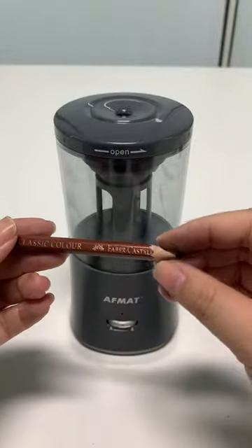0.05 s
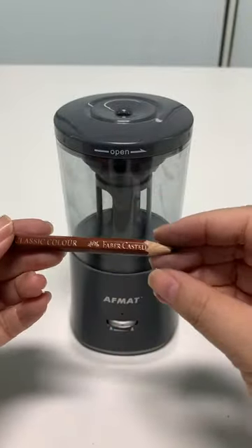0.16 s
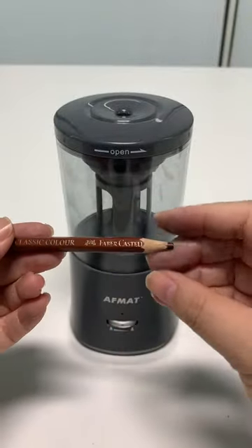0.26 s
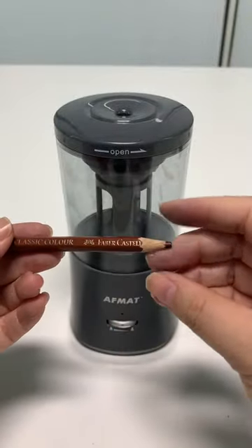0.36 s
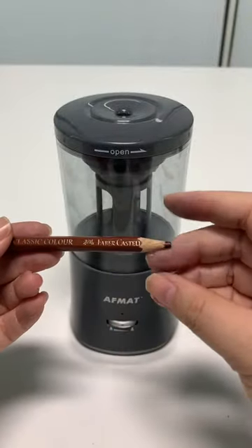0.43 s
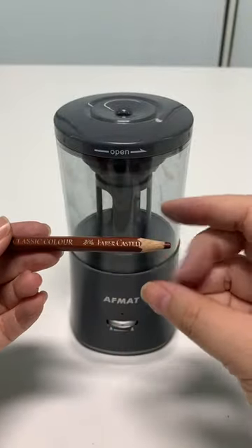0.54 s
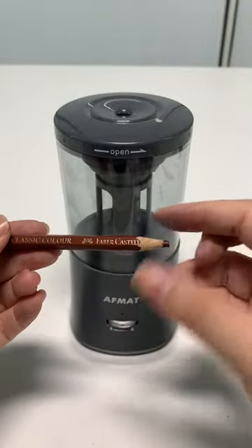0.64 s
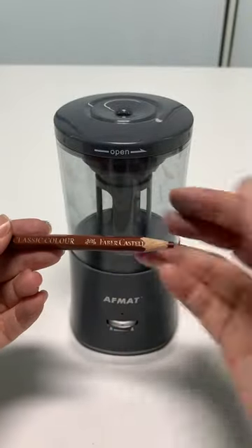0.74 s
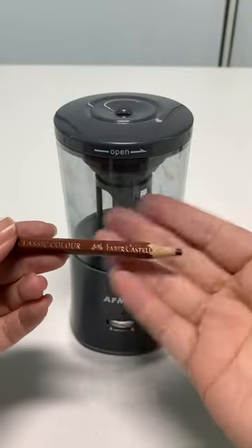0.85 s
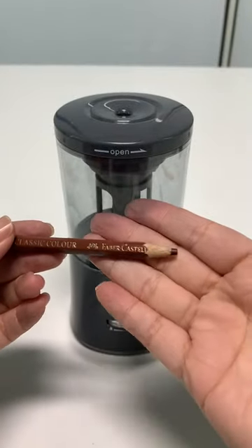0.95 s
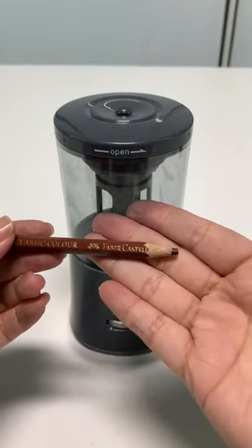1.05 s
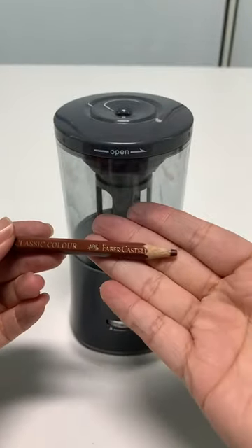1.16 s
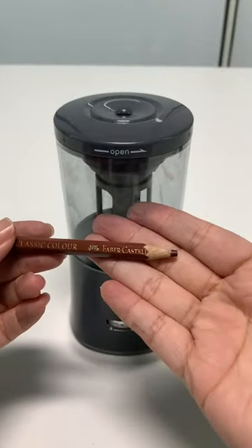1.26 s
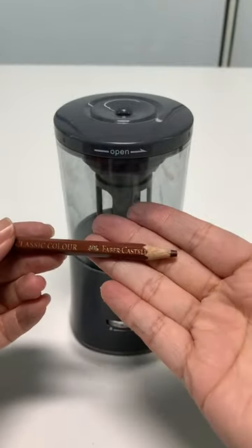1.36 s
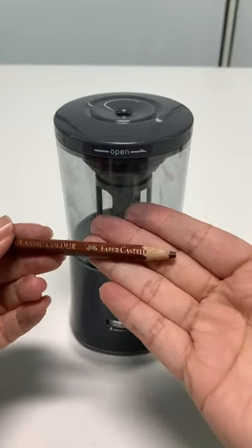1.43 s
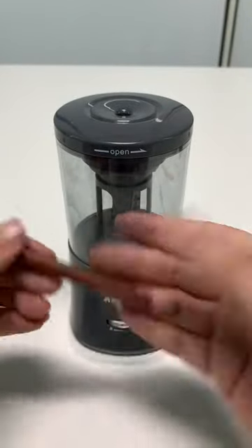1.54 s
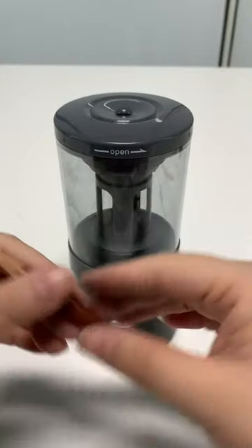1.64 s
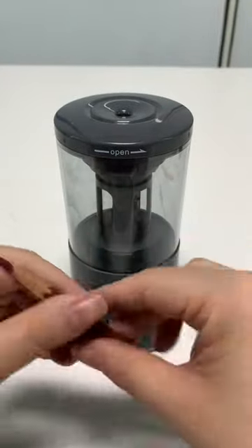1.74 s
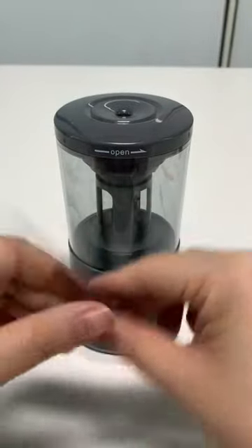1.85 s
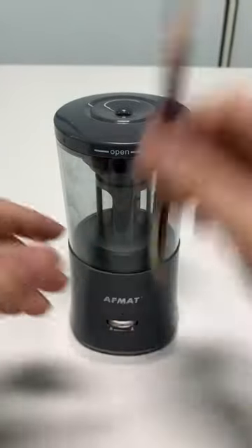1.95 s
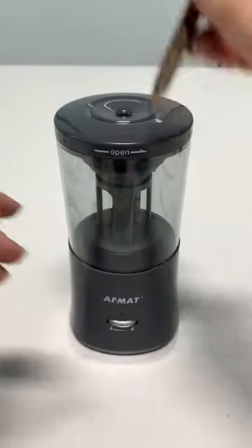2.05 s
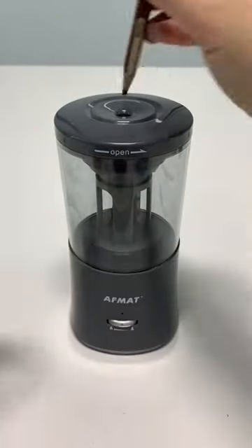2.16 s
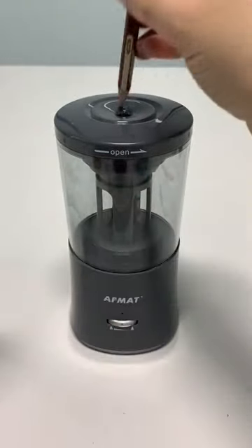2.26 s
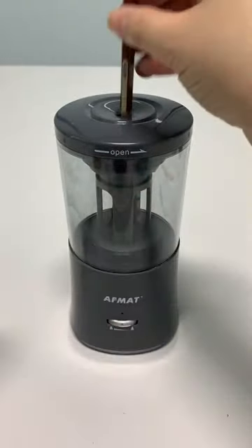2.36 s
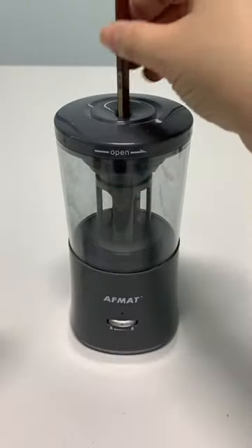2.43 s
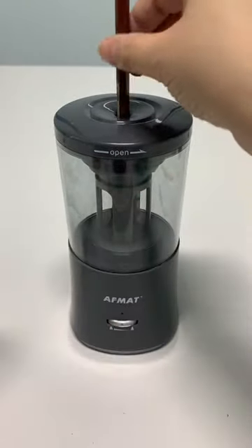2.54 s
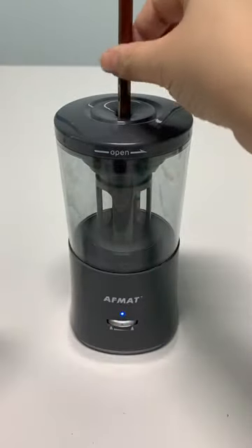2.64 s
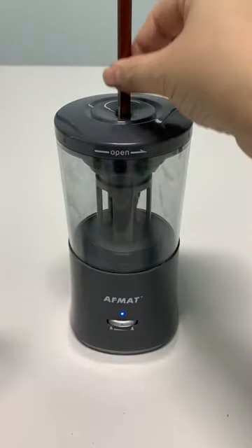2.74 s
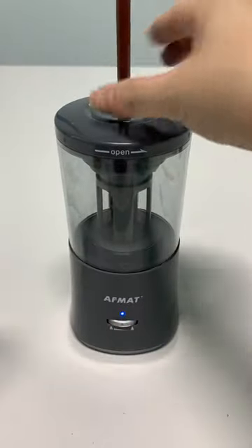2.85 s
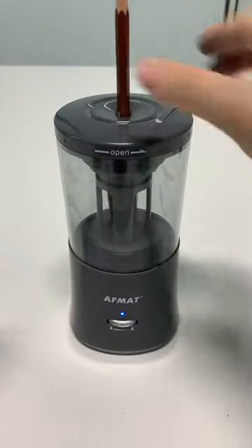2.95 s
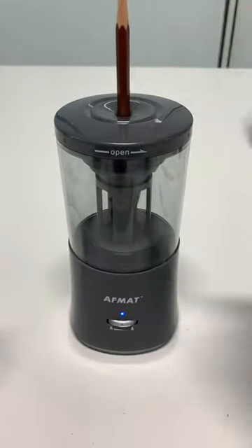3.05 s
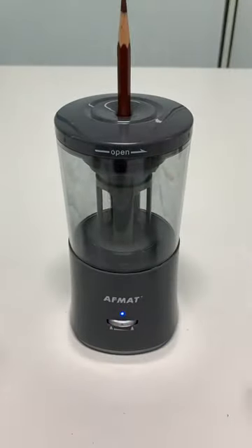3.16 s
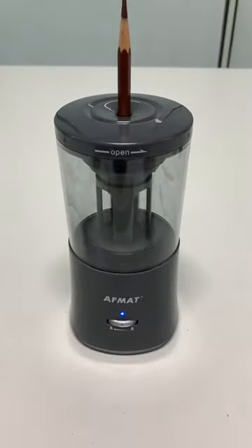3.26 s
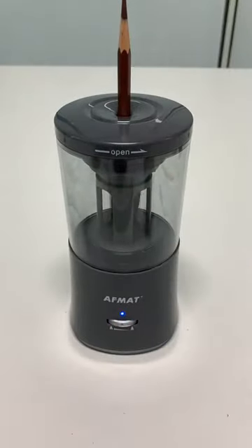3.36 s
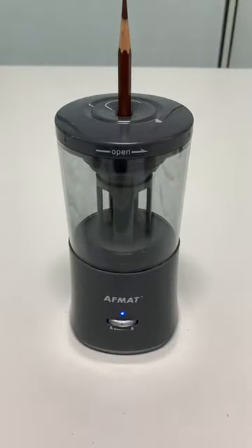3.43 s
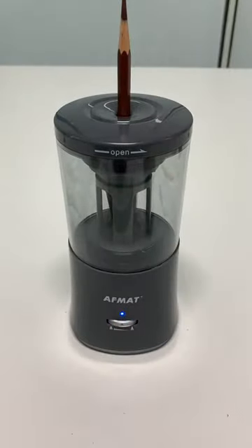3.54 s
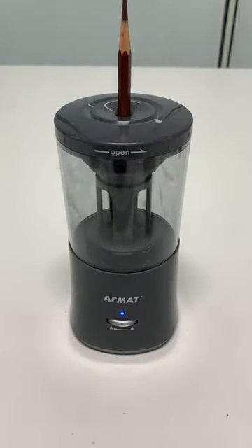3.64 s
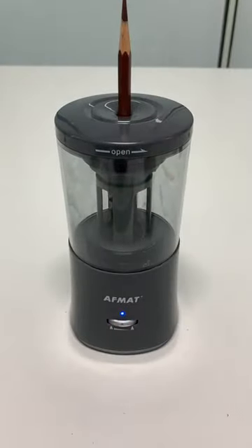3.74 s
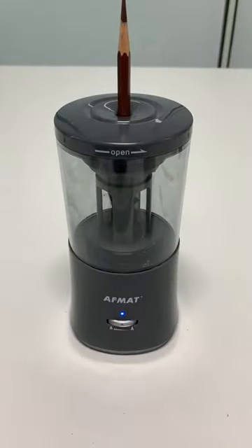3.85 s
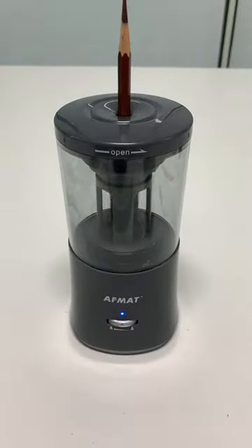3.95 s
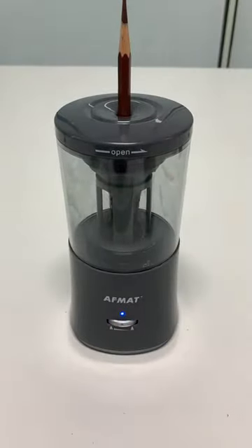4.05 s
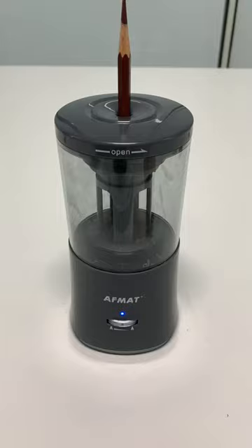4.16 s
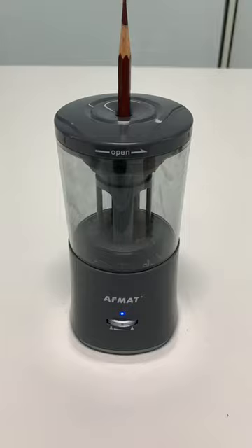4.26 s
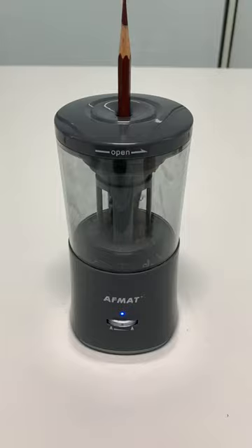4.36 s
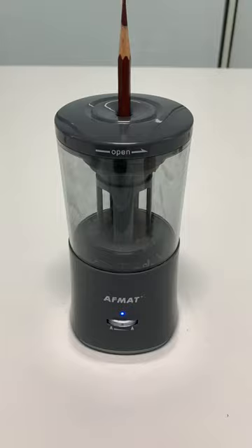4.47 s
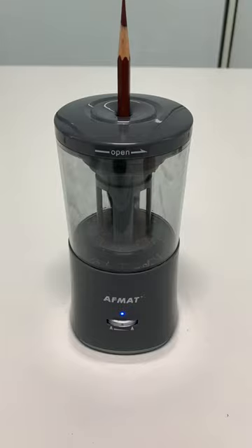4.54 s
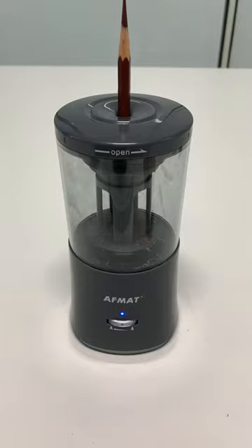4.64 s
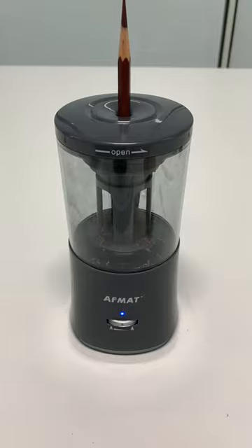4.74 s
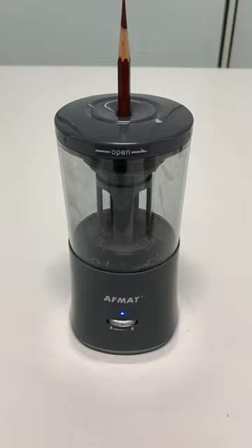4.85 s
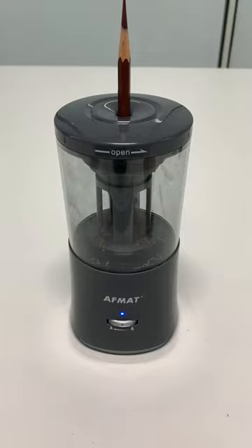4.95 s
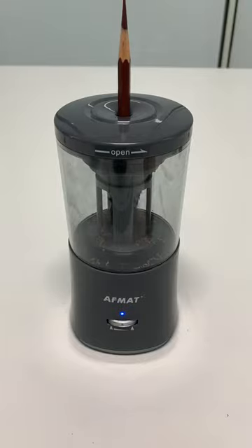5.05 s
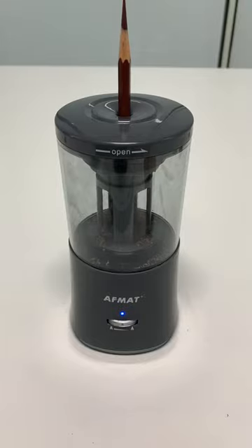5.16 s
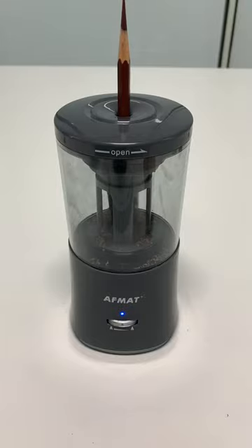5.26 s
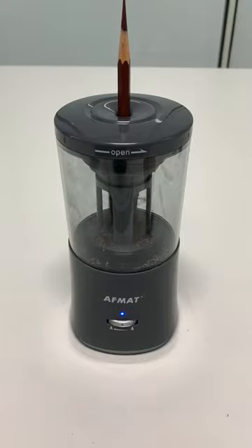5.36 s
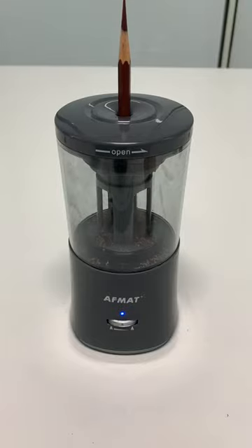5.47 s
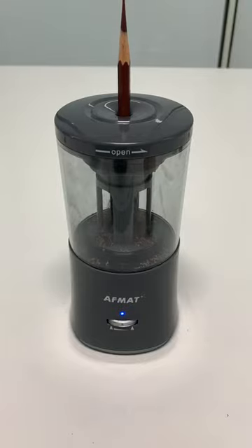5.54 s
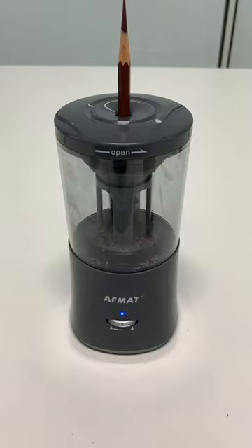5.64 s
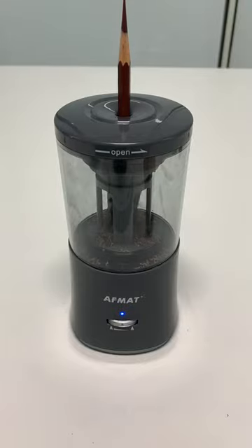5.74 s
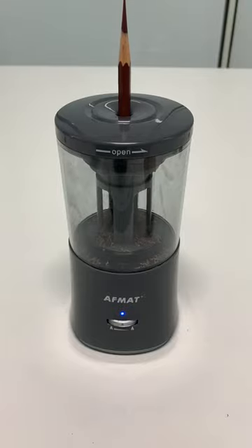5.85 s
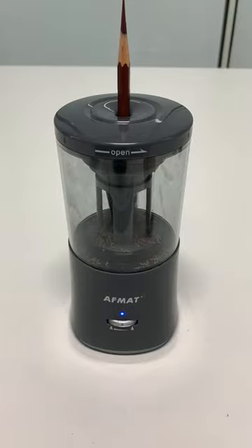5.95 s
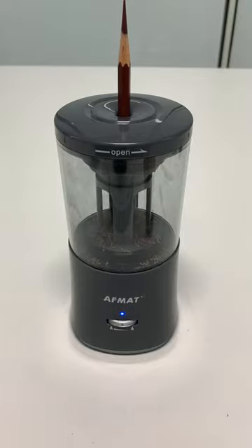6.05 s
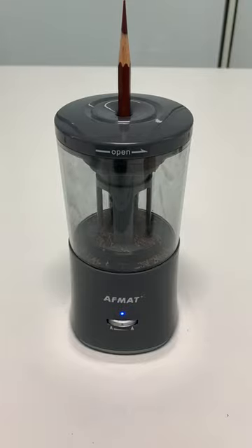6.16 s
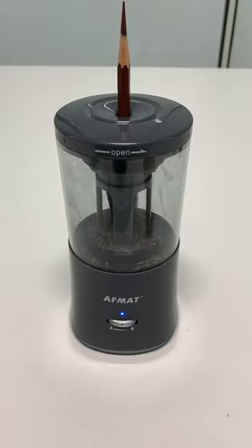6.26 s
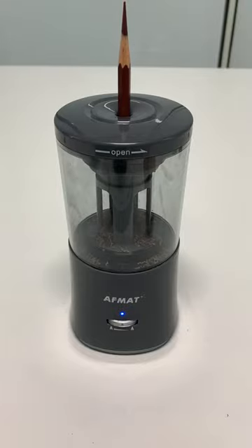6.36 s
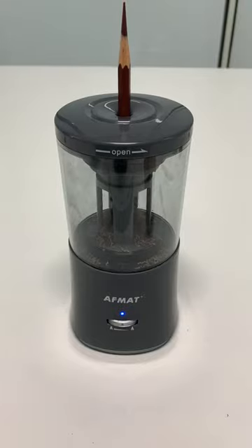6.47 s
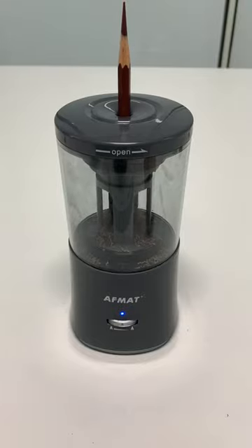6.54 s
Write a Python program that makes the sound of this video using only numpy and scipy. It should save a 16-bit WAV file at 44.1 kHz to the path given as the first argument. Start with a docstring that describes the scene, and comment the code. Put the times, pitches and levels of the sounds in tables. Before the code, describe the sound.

In a quiet room, hands faintly rub a pencil, it ticks into a small electric sharpener, and the motor whirs up and grinds harshly.

```python
"""A quiet room with an electric pencil sharpener on a desk, heard close up by a pair of microphone ports.
Over a low rumble, hands rub a pencil as band-limited noise; it scrapes and ticks into the hole as tiny impacts.
The motor spins up, its hum, gear whine and brush buzz locked to the shaft, then sags as the cutter bites.
Random impacts rattle the gears, hiss on the steel and rasp through the wood three turns a second.
At last the drive lets go and the gears and cutter fall away."""
import sys
import numpy as np
from scipy import signal
from scipy.fft import rfft, irfft, next_fast_len
from scipy.io import wavfile

SR = 44100
rng = np.random.default_rng(int(sys.argv[2]) if len(sys.argv) > 2 else 0)


def to_wav(sig):
    """Store sig (one row per channel, or 1-D mono) as 16-bit WAV at the path in sys.argv[1].

    Samples outside -1..1 are clipped; the rate is SR.
    """
    pcm = np.clip(np.atleast_2d(sig), -1, 1) * 32767
    pcm = np.round(pcm).astype(np.int16)
    wavfile.write(sys.argv[1], SR, pcm.T)  # frames by channels


N = 291060
T = np.arange(N) / SR
SIZE = next_fast_len(N + SR // 4)  # padded length for filtering
HZ = np.fft.rfftfreq(SIZE, 1 / SR)


def amp(db):
    """Decibels to amplitude."""
    return 10 ** (np.asarray(db) / 20)


def unit(x):
    """Scales a signal to rms 1."""
    return x / np.sqrt(np.mean(x ** 2) + 1e-20)


def noise():
    """White noise."""
    return rng.standard_normal(N)


def curve(rows):
    """A table's values joined by straight lines in time."""
    seconds, value = np.transpose(rows)
    return np.interp(T, seconds, value)


def read(points, hz):
    """A spectrum joined on a log-frequency axis."""
    f, value = np.transpose(points)
    return np.interp(np.log(hz + 1), np.log(f + 1), value)


def shaped(x, response):
    """Filters by a response given on HZ."""
    return irfft(rfft(x, SIZE) * response, SIZE)[..., :N]


def colour(x, points):
    """Filters by a dB spectrum."""
    return shaped(x, amp(read(points, HZ)))


def ringing(modes):
    """The response of a set of resonances on HZ."""
    return sum(amp(db) / (1 + 1j * (HZ ** 2 - hz ** 2) / (width * HZ + 1)) for hz, width, db in modes)


def wander(hz):
    """A random curve of rms 1, joining two random values per cycle of the given rate."""
    steps = T * 2 * hz
    knots = rng.standard_normal(4096)
    return unit(np.interp(steps, np.arange(len(knots)), knots))


def grains(per_s, spread_db):
    """Random tiny impacts, a few much larger than the rest."""
    size = amp(spread_db * np.minimum(rng.exponential(1, N), 4))
    struck = rng.random(N) < per_s / SR
    return unit(noise() * size * struck)


def swell(s, length):
    """A bell-shaped rise and fall around a moment."""
    return np.exp(-2 * ((T - s) / length) ** 2)


START_S, RISE_S, RELEASE_S = 2.6006, 0.089, 6.5  # the drive starts, comes up to level, and lets go
GEAR_FALL_DB_PER_S, GEAR_COAST_DB = 245, -10
HISS_FALL_DB_PER_S, HISS_COAST_DB = 598, -17


def coast(fall_db_per_s, rest_db):
    """The drop in dB once the drive lets go."""
    return np.maximum(-fall_db_per_s * np.maximum(T - RELEASE_S, 0), rest_db)


# Rumble of the building. Each row: frequency in Hz, relative level in dB.
ROOM_SPECTRUM = [(15, -54), (27, -35), (43, -1), (104, -4.5), (131, -6.5), (287, -15), (420, -20.5),
                 (560, -35.5), (1200, -33.5), (1800, -40.5), (2300, -47.5), (3600, -49.5), (4800, -62.5),
                 (6500, -46.5), (9000, -60.5), (11500, -51)]
# Low tones that come and go in the room. Each row: middle in seconds, length in seconds,
# frequency in Hz, level in dB.
DRONES = [(.6, 0.79, 99.9, -66), (.66, 0.13, 56.8, -58), (1.273, 0.22, 101.5, -53.5),
          (1.75, 0.35, 101, -57.5), (2.07, .15, 56.4, -61), (2.32, 0.42, 199, -63)]
RUMBLE_DB = -59


def room_tone(unsteady_db=1, waver=.3):
    """Low, unsteady rumble and drone of the building; the rumble is nearly alike at both ports."""
    common = unit(colour(noise(), ROOM_SPECTRUM))
    apart = unit(colour(noise(), ROOM_SPECTRUM))
    rumble = common + amp(-16) * np.array([apart, -apart])
    drone = 0
    for s, length, hz, db in DRONES:
        tone = unit(np.sin(2 * np.pi * hz * T + waver * wander(6)))
        drone = drone + amp(db) * swell(s, length) * tone
    return amp(RUMBLE_DB + unsteady_db * wander(14.0)) * rumble + drone


# Hands brushing over the pencil and each other. Each row: middle in seconds, length in seconds,
# low rub in dB, soft swish in dB.
RUBS = [(0.095, 0.2, -66, -68.5), (0.323, 0.31, -58.5, -70.5), (0.677, 0.16, -66, -76),
        (1.143, 0.088, -69, -84), (1.257, 0.24, -57, -72), (1.542, 0.18, -67, -72.5),
        (1.8, 0.18, -66, -72.5), (1.98, 0.56, -65.5, -69.5)]
# Dull rub of skin. Each row: frequency in Hz, relative level in dB.
RUB_SPECTRUM = [(30, -25), (70, 0), (102, 0), (160, 0), (300, -2), (450, -14), (700, -56)]
# Soft swish above the rub. Each row: frequency in Hz, relative level in dB.
SWISH_SPECTRUM = [(300, 0.5), (600, -1.5), (900, -0.5), (1400, -0.5), (1800, -9.5), (2300, -23),
                  (4000, -26)]


def hands(uneven_db=1.5):
    """Skin slides on the pencil: a dull rub with a soft swish above it."""
    rub_level = sum(amp(db) * swell(s, length) for s, length, db, _ in RUBS)
    swish_level = sum(amp(db) * swell(s, length) for s, length, _, db in RUBS)
    rub = rub_level * unit(colour(noise(), RUB_SPECTRUM))
    swish = swish_level * unit(colour(noise(), SWISH_SPECTRUM))
    return (rub + swish) * amp(uneven_db * wander(5.3))


# Fingertip on the point. Each row: frequency in Hz, relative level in dB.
FLICK_SPECTRUM = [(2000, -20), (4000, -4), (5500, -8), (7000, 7), (8500, -14), (11000, -8)]


def finger(s=1.835, length_s=.012, level_db=-70):
    """A fingertip flicks softly over the pencil's point."""
    return amp(level_db) * swell(s, length_s) * unit(colour(noise(), FLICK_SPECTRUM))


# Pencil rubbing in the guide. Each row: time in seconds, level in dB.
SLIDE_LEVEL = [(2.35, -110), (2.365, -67), (2.38, -62), (2.41, -64), (2.435, -58), (2.48, -65), (2.51, -61),
               (2.545, -60), (2.58, -66), (2.622, -79), (2.632, -55), (2.66, -50), (2.7, -110)]
# Ring of the pencil in the guide, also heard in its catches. Each row: frequency in Hz, relative level in dB.
GUIDE_SPECTRUM = [(300, -14), (1200, -3.5), (2200, 0), (3200, -10), (4200, 1), (4900, 0), (5700, 3),
                  (7100, -18), (8000, -15), (11000, -23), (12500, -31)]


def slide(push_s=2.57, push_db=-52, body_hz=125, length_s=0.086, catch_db=2):
    """The pencil scrapes down the guide in small catches and, as it seats, sways the whole body."""
    scrape = amp(curve(SLIDE_LEVEL) + catch_db * wander(50)) * unit(colour(grains(4000, 0.95), GUIDE_SPECTRUM))
    push = amp(push_db) * np.exp(-((T - push_s) / length_s) ** 2)
    return scrape + push * np.sin(2 * np.pi * body_hz * T)


CLICK_T60_S = .065  # time for a click's rattle to fall 60 dB


def clicks(rows, body, click_db, tail_db, crack_s):
    """Each snap is a short crack and a dying rattle, noise coloured by the body it strikes."""
    power = np.zeros(N)
    for s, db in rows:
        age = np.maximum(T - s, 0)
        crack = np.exp(-age / crack_s)
        rattle = amp(tail_db - 60 * age / CLICK_T60_S) ** 2
        power += (T >= s) * amp(db + click_db) ** 2 * (crack + rattle)
    return unit(colour(noise(), body)) * np.sqrt(power)


# The pencil catching on the guide as it goes down. Each row: start in seconds, level in dB before click_db.
CATCHES = [(2.379, -45), (2.388, -57), (2.43, -43), (2.4485, -44.5), (2.498, -55), (2.542, -55)]


def guide_catches():
    """The pencil snags on the guide with small clicks that ring the pencil."""
    return clicks(CATCHES, GUIDE_SPECTRUM, click_db=-2.5, tail_db=-18, crack_s=0.0034)


# Sharp snaps: the pencil's tip landing in the hole, then the feed rollers.
# Each row: start in seconds, level in dB before click_db.
SNAPS = [(2.429, -36.5), (3.039, -13), (3.2625, -10), (3.431, -13), (3.5982, -9.5), (3.9622, -14),
         (4.1512, -13.5), (4.3228, -9.5), (4.5133, -14.5), (4.6892, -16), (4.8785, -19), (5.065, -23),
         (5.447, -19), (5.501, -17), (5.629, -12.5), (5.802, -13), (5.9743, -14), (6.1423, -16),
         (6.3185, -13), (6.4955, -13.5)]
# Ring of the plastic head, also heard in the crackle. Each row: frequency in Hz, relative level in dB.
HEAD_SPECTRUM = [(300, -26), (1200, -11), (2300, -5), (3300, -2), (4200, -2), (4900, -7), (5800, 1),
                 (6500, -3), (7100, -1), (8500, -7), (11000, -5), (12500, -14)]


def snaps():
    """The tip, then the feed rollers, snap against the plastic head and leave a dying rattle."""
    return clicks(SNAPS, HEAD_SPECTRUM, click_db=-2.5, tail_db=-24, crack_s=0.0014)


# Rotor speed, slowed about ten times a second as the blade drags on the wood.
# Each row: time in seconds, speed in turns a second before the flutter.
SHAFT_SPEED = [(2.63, 103), (2.69, 165), (2.76, 208), (2.81, 231), (2.85, 237), (2.96, 238), (3.14, 245.5),
               (3.2, 245.9), (3.38, 205.0), (3.42, 208.2), (3.47, 222.1), (3.55, 221.4), (3.6, 210.4),
               (3.66, 207.7), (3.7, 199.7), (3.74, 201.7), (3.78, 191.8), (3.85, 209.4), (3.97, 200.4),
               (4.02, 207.6), (4.08, 190.8), (4.14, 204.2), (4.18, 198.0), (4.23, 205.0), (4.28, 199.5),
               (4.33, 207.3), (4.38, 203.7), (4.42, 210.6), (4.47, 197.5), (4.52, 202.6), (4.57, 199.9),
               (4.61, 207.3), (4.67, 198.3), (4.71, 205.9), (4.76, 189.9), (4.8, 203.8), (4.86, 191.9),
               (4.91, 202.1), (4.95, 199.2), (5.0, 207.3), (5.05, 200.3), (5.11, 203.9), (5.15, 194.5),
               (5.19, 201.8), (5.24, 196.2), (5.29, 204.3), (5.35, 195.6), (5.39, 205.7), (5.44, 189.1),
               (5.49, 199.3), (5.54, 193.4), (5.59, 201.0), (5.64, 197.3), (5.69, 211.4), (5.73, 205.5),
               (5.78, 209.6), (5.83, 199.2), (5.88, 208.5), (5.92, 196.8), (5.97, 208.2), (6.02, 204.0),
               (6.07, 213.7), (6.12, 200.8), (6.16, 209.4), (6.2, 203.0), (6.25, 219.0), (6.29, 208.9),
               (6.34, 214.8), (6.38, 208.5), (6.43, 214.6), (6.48, 194.8), (6.53, 209.4), (6.55, 209.8)]
FLUTTER_TURNS_PER_S, FLUTTER_RATE_HZ = 0.3074, 50  # small quick jolts of the shaft speed


def shaft():
    """Shaft speed with a slight flutter."""
    return curve(SHAFT_SPEED) + FLUTTER_TURNS_PER_S * wander(FLUTTER_RATE_HZ)


# Out-of-balance hum of the rotor. Each row: time in seconds, level in dB.
HUM_LEVEL = [(2.63, -49), (2.74, -48), (2.85, -41.5), (3.2, -37), (3.35, -47), (3.47, -42.5), (3.65, -41),
             (3.8, -49.5), (6.5, -48), (6.6, -50)]
# Ten-tooth pinion, its overtones and sidebands. Each row: multiple of the shaft speed,
# relative level in dB when cutting, relative level in dB when running free.
MESH_LINES = [(9, -2, -7), (10, 2.5, -5), (11, -3.5, -8), (12, -2, -5), (15, -16, -7), (17, -7, -20),
              (18, -11, -18), (19, -10, -30), (20, 3.5, -30), (21, -10, -14), (22, -9, -30), (23, -11, -30),
              (25, -22, -14), (30, -.5, -20), (31, -7, -20), (33, -8, -25), (39, -9, -20), (40, -3.5, -25),
              (46, -8, -20), (48, -11, -25), (51, -7.5, -30), (52, -8, -30)]
# Gear whine. Each row: time in seconds, level in dB before the coast.
WHINE_LEVEL = [(2.66, -52), (2.8, -38), (3.2, -37), (3.3, -32.5), (3.4, -36), (3.52, -30.5), (3.7, -35.5),
               (4.4, -36), (4.8, -34.5), (5.5, -36), (6, -35.5), (6.5, -37.5)]
# How the housing radiates the whine. Each row: frequency in Hz, gain in dB.
RADIATION = [(5800, -0.5), (6250, -1), (6650, -3), (6850, 4.5), (7500, 2)]
# Brush buzz of the free motor. Each row: frequency in Hz, relative level in dB.
BUZZ_SPECTRUM = [(700, -32), (1400, -19), (2500, -16), (3600, -12), (4300, -26), (5400, -24), (6000, -9),
                 (6950, -11), (7150, 0), (7550, 0), (7750, -8), (8400, -8), (9150, -10), (9400, 0),
                 (9750, -9), (10300, -5), (10600, -11), (11000, -6), (11600, -22)]


def motor(speed, load, hiss_db, buzz_db=2, second_db=-11, damped_db=-11, full_speed=235):
    """Lines locked to the shaft: rotor hum, gear whine, and a brush buzz damped under load."""
    jitter = 1 + 0.001866 * load * wander(45)
    angle = 2 * np.pi * np.cumsum(speed * jitter) / SR

    hum = np.sqrt(2) * (np.sin(angle) + amp(second_db) * np.sin(2 * angle))
    hum = hum * (1 + 0.21 * wander(40)) * amp(curve(HUM_LEVEL))

    # uneven teeth shake each line in level and phase
    whine = np.zeros(N)
    for k, cut_db, free_db in MESH_LINES:
        level = amp(cut_db * load + free_db * (1 - load)) * (1 + .45 * wander(22))
        whine += level * np.cos(k * angle + .35 * wander(45))
    whine_db = curve(WHINE_LEVEL) + coast(GEAR_FALL_DB_PER_S, GEAR_COAST_DB)
    whine = colour(whine, RADIATION) * amp(whine_db)

    # the brushes scrape over the same rough track on every turn
    turn = np.linspace(0, 2 * np.pi, 2049)
    track = sum(np.cos(k * turn + 2 * np.pi * rng.random()) for k in range(3, 52))
    buzz = unit(colour(np.interp(angle % (2 * np.pi), turn, track), BUZZ_SPECTRUM))
    buzz_level = amp(hiss_db + buzz_db + damped_db * load) * np.minimum(speed / full_speed, 1) ** 3
    return hum + whine + buzz * buzz_level


# Splinters wedging under the blade, making the gears chatter. Each row: middle in seconds,
# length in seconds, rise in dB.
SURGES = [(3.355, 0.036, 5), (4.647, .04, 0.5), (5.427, 0.035, 4.5), (6.098, 0.028, 3.5), (6.455, 0.065, 4)]
# Rattle of the gears in the housing. Each row: frequency in Hz, relative level in dB.
RATTLE_SPECTRUM = [(30, -65), (120, -9), (350, -9.5), (600, -17), (800, -4.5), (1250, -2), (1550, -2.5),
                   (1900, -0.5), (2400, 5), (2800, 0), (3200, -2.5), (3600, 4.5), (4100, -3), (5000, -74),
                   (6500, -11)]
# Narrow rings of the housing, struck by the teeth. Each row: frequency in Hz, width in Hz, relative level in dB.
HOUSING_MODES = [(1874, 170, 1), (1980, 60, -4.5), (2220, 43, -6.5), (2480, 41, 2), (2900, 100, -6),
                 (3560, 66, -3), (3750, 25, -5), (4034, 50, -2), (5900, 48, -6), (6240, 63, -1.5)]
# Upper clatter of the teeth. Each row: frequency in Hz, relative level in dB.
CLATTER_SPECTRUM = [(3800, -40), (4300, 0), (4700, -1), (5100, -2), (5400, -5), (5800, -40)]
# Hiss of the steel cutter. Each row: frequency in Hz, relative level in dB.
HISS_SPECTRUM = [(2500, -9.5), (4400, -64), (5200, 7), (5600, 6), (6100, 2.5), (6800, 2), (7400, -1),
                 (8000, 3.5), (8700, -21), (9400, 3.5), (10000, -1.5), (10800, 3.5), (11300, 7.5),
                 (11700, 1.5), (12200, -5)]


def gears(load, gear_db, hiss_db, rattle_db=-3.5, housing_db=-8, clatter_db=-12, fizz_db=-1, crackle_db=-11,
          free_db=-9, loose_db=-5):
    """Teeth clatter and ring the housing, the steel cutter hisses and splinters crackle."""
    surge_db = sum(db * swell(s, length) for s, length, db in SURGES)
    rattle = unit(colour(grains(8000, 3.1), RATTLE_SPECTRUM)) * amp(rattle_db)
    housing = unit(shaped(grains(3000, 0.72), ringing(HOUSING_MODES)))
    housing = housing * amp(housing_db + loose_db * (1 - load))
    clatter = unit(colour(grains(10000, 1.8), CLATTER_SPECTRUM)) * amp(clatter_db)
    teeth = (rattle + housing + clatter) * amp(gear_db + surge_db + 1.34 * wander(60))

    contact = amp(hiss_db + free_db * (1 - load) ** 2)
    hiss = unit(colour(grains(9000, 1.6), HISS_SPECTRUM)) * amp(fizz_db + 1.3 * wander(60))
    crackle = unit(colour(grains(260, 3.5), HEAD_SPECTRUM)) * amp(crackle_db)
    return teeth + contact * (hiss + crackle)


# Once a turn the blade bites deep, and the cup swells near it. Each row: middle in seconds, length in seconds,
# rasp in dB, ring in dB, delay of the ring in seconds; rasp and ring are before the blade's own gains.
BITES = [(3.244, 0.08, -34.5, -30, 0.1), (3.582, 0.054, -31, -31.5, 0.068), (3.902, 0.078, -30, -30, 0.08),
         (4.234, 0.084, -28.5, -30.5, 0.084), (4.551, 0.094, -28.5, -30.5, 0.096),
         (4.91, 0.12, -33.5, -37, 0.098), (5.276, 0.087, -31.5, -46, 0.043),
         (5.627, 0.068, -28.5, -35, -0.016), (5.95, 0.091, -29.5, -31, -0.000076),
         (6.305, 0.065, -31.5, -48, 0.13)]
RING_S = 0.067  # length of the cup's swell
RASP_DB, CUP_DB = -36.5, -34.5  # the lighter cut between bites, before the blade's own gains


def cut(load, idle_db=-12, uneven_db=2.0, coast_db=-6):
    """Levels in dB of the rasp and the cup's ring: an uneven light cut with one deep bite a turn."""
    light_db = coast(GEAR_FALL_DB_PER_S, coast_db)
    rasp_power = amp(RASP_DB + light_db + 0.95 * uneven_db * wander(12)) ** 2
    cup_power = amp(CUP_DB + light_db + idle_db * (1 - load) + uneven_db * wander(12)) ** 2
    for s, length, rasp_db, ring_db, delay in BITES:
        rasp_power = rasp_power + (amp(rasp_db) * swell(s, length)) ** 2
        cup_power = cup_power + (amp(ring_db) * swell(s + delay, RING_S)) ** 2
    return 10 * np.log10(rasp_power), 10 * np.log10(cup_power)


# Body shaken by the cut. Each row: frequency in Hz, relative level in dB.
RASP_SPECTRUM = [(20, -60), (50, -38), (110, -12), (160, -7), (220, -4.5), (290, -1), (390, -2),
                 (480, -6.5), (600, -17), (900, -6), (2000, -84)]
# Shavings cup. Each row: frequency in Hz, width in Hz, relative level in dB.
CUP_MODES = [(774, 52, -10.5), (969, 36, -4), (1036, 87, 2), (1460, 230, -3)]


def blade(load, rasp_db, cup_db, body_db=-2.5, ring_db=-2.0, free_db=-9, chatter_db=1.7):
    """Chips break off the wood in clumps; they shake the body and ring the cup."""
    chips = grains(2700, 1.8) * amp(chatter_db * wander(40))
    body = unit(colour(chips, RASP_SPECTRUM)) * amp(rasp_db + body_db + free_db * (1 - load))
    cup = unit(shaped(chips, ringing(CUP_MODES))) * amp(cup_db + ring_db)
    return body + cup


# Phase lead of the left port over the right. Each row: frequency in Hz, lead in half turns.
PORT_PHASE = [(0, 0), (400, -.07), (700, -.38), (900, -.11), (1300, -.2), (1950, .06), (2400, .62),
              (3100, .25), (3800, .5), (4150, .6), (4450, 1), (5250, 1), (6400, 2), (7250, 2), (8150, 2.6),
              (8500, 3), (9450, 3), (10500, 4), (11300, 4.1), (12000, 4.45)]
# Level of the left port over the right. Each row: frequency in Hz, difference in dB.
PORT_BALANCE = [(300, 0), (750, -2.5), (1000, 0), (1500, -2), (2300, -3.5), (2900, 0), (3600, -1),
                (4300, 0)]
# Reflections from the desk and walls. Each row: frequency in Hz, level in dB before wet_db.
REFLECTIONS = [(60, -22), (130, -8), (200, -7), (350, -15), (680, -2), (1000, -10), (1500, -5), (3000, -3),
               (4000, -5), (4500, -33), (5200, -30), (5700, -5), (6800, -22), (7900, -7), (8500, -34),
               (9300, -32), (9900, -6), (11000, -20)]


def ports(x, wet_db, t60=0.11, turns_per_s=2.9, count=3):
    """Direct sound differs in phase and level at each port; short diffuse tails cycle at a steady rate."""
    phase = np.interp(HZ, *np.transpose(PORT_PHASE))
    # each port takes half the difference
    lead = np.exp(.5j * np.pi * phase) * amp(read(PORT_BALANCE, HZ) / 2)
    out = shaped(x, np.array([lead, 1 / lead]))
    wet = amp(wet_db) * colour(x, REFLECTIONS)
    age = T[:SR // 3]
    for k in range(count):
        tail = rng.standard_normal((2, len(age))) * amp(-60 * age / t60) * (age > .002)
        tail /= np.linalg.norm(tail, axis=1, keepdims=True)
        facing = np.sqrt(2 / count) * np.cos(np.pi * (2 * turns_per_s * T + k / count))
        out = out + signal.oaconvolve((wet * facing)[None], tail, axes=1)[:, :N]
    return out


# Cutting load. Each row: time in seconds, share of the full load from 0 to 1.
CUTTING_LOAD = [(2.63, 0.33), (2.76, 0.38), (2.84, 0.15), (3.19, 0.32), (3.32, 0.92), (3.5, 0.81),
                (3.65, 1), (6.6, 0.97)]
# Effort of the gears. Each row: time in seconds, level in dB before coast and unevenness.
GEAR_LEVEL = [(2.66, -29.5), (2.72, -34), (2.98, -30), (3.11, -27.5), (3.19, -31), (3.3, -30), (3.6, -28),
              (3.85, -29.5), (4.4, -28.5), (6.5, -28.5)]
# Hiss of the cutter, which also sets the brush buzz. Each row: time in seconds, level in dB before the coast.
CUTTER_LEVEL = [(2.68, -30.5), (2.98, -29), (3.2, -29.5), (3.5, -30.5), (3.9, -30), (5.3, -31),
                (6.5, -29.5)]


def scene(feed_s=0.36, uneven_db=0.6, motor_wet_db=-6, cut_wet_db=0):
    """The machine, the pencil and the hands over the room tone."""
    load = np.clip(curve(CUTTING_LOAD), 0, 1)
    gear_db = curve(GEAR_LEVEL) + coast(GEAR_FALL_DB_PER_S, GEAR_COAST_DB) + uneven_db * wander(7.9)
    hiss_db = curve(CUTTER_LEVEL) + coast(HISS_FALL_DB_PER_S, HISS_COAST_DB)
    running = np.clip((T - START_S) / RISE_S, 0, 1) ** 2.57
    fed = np.clip((T - START_S) / feed_s, 0, 1)  # the rollers draw the pencil onto the blade

    handling = hands() + finger() + slide() + guide_catches() + snaps()
    rasp_db, cup_db = cut(load)
    grinding = gears(load, gear_db, hiss_db) + fed * blade(load, rasp_db, cup_db)
    spinning = running * motor(shaft(), load, hiss_db)
    return room_tone() + ports(handling + running * grinding, cut_wet_db) + ports(spinning, motor_wet_db)


EDGE_HZ = 12000


def record(dry):
    """The band limit of the recorder."""
    lowpass = signal.firwin(511, EDGE_HZ, window=("kaiser", 9), fs=SR)
    return signal.oaconvolve(dry, lowpass[None], "same")


dry = scene()
out = record(dry)
to_wav(out)
```